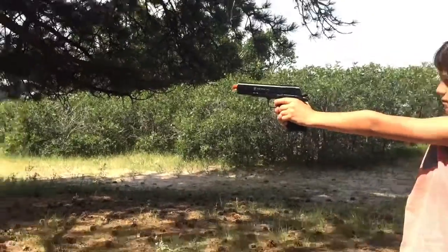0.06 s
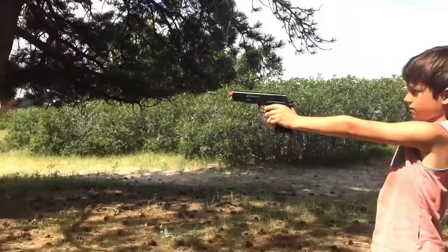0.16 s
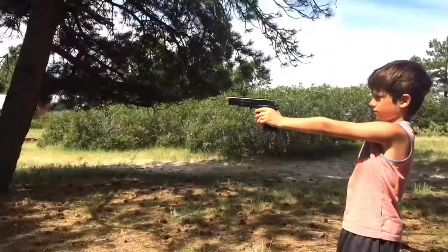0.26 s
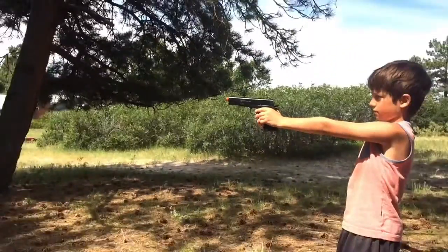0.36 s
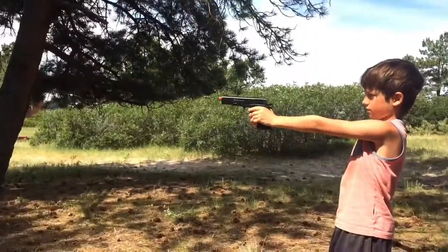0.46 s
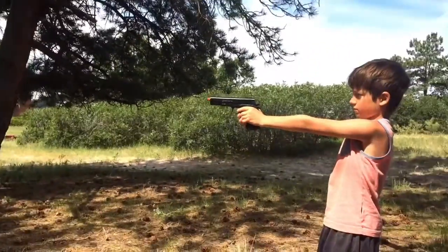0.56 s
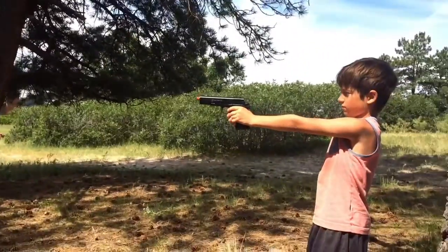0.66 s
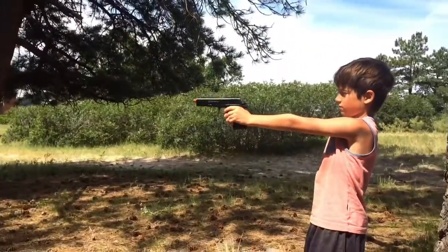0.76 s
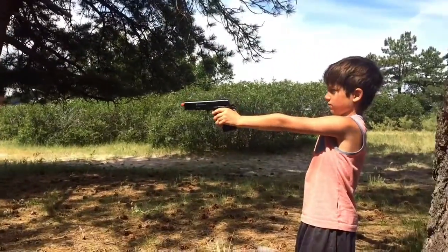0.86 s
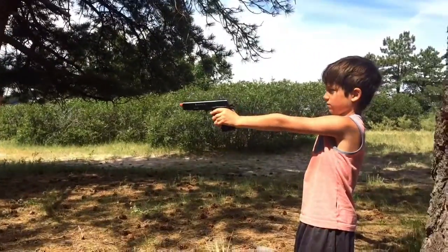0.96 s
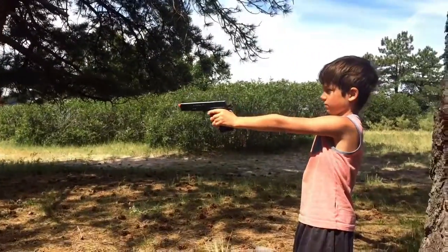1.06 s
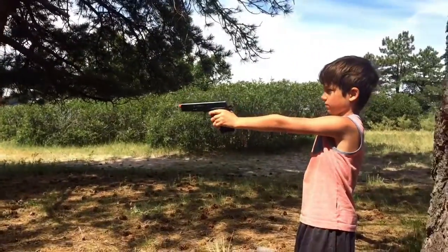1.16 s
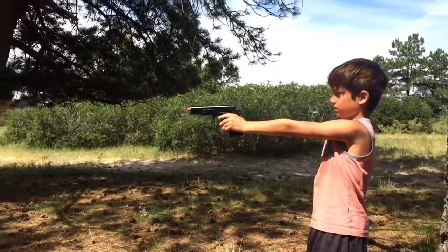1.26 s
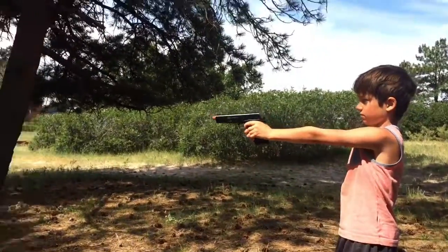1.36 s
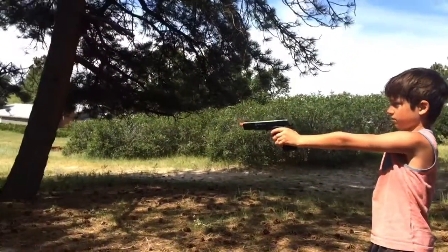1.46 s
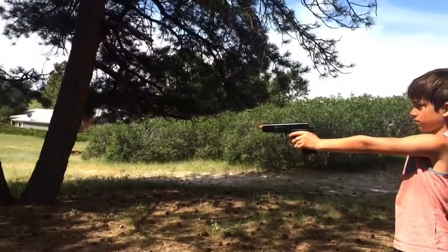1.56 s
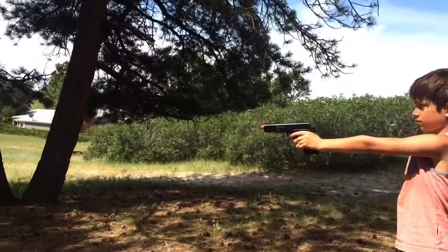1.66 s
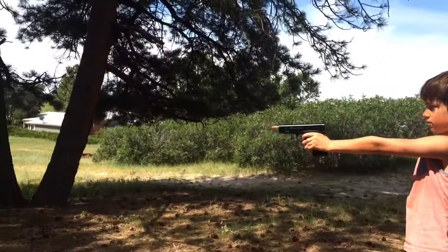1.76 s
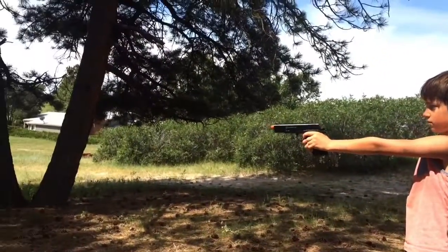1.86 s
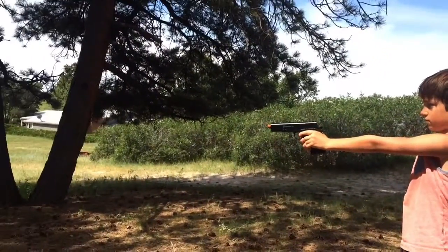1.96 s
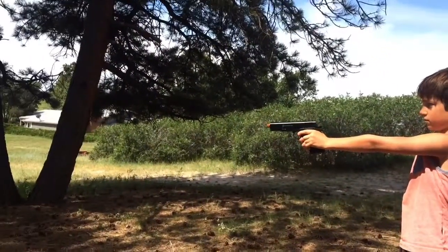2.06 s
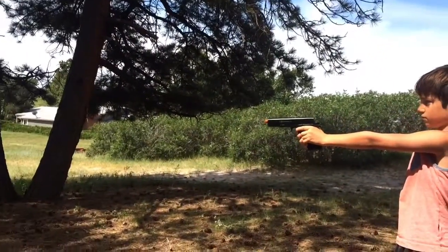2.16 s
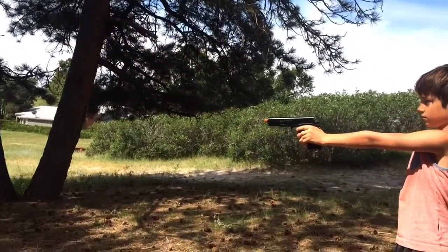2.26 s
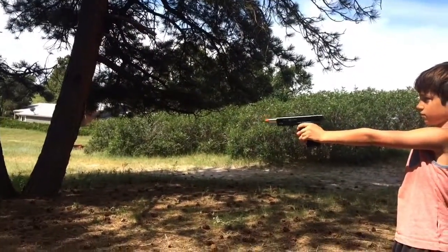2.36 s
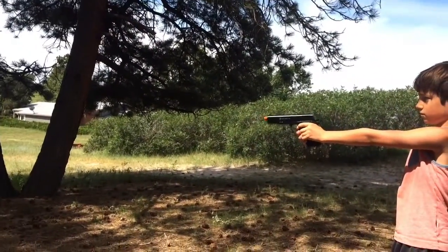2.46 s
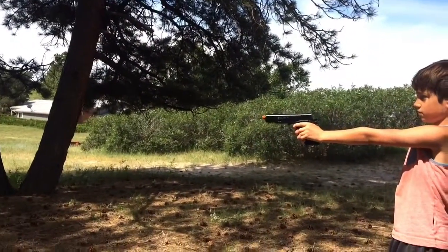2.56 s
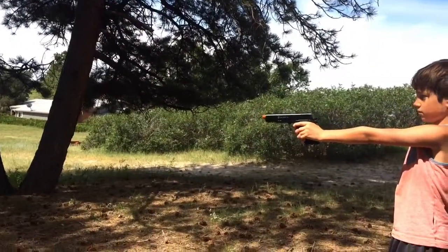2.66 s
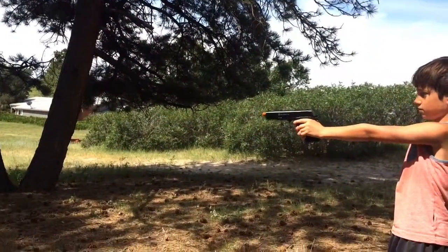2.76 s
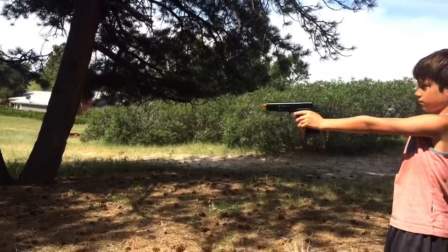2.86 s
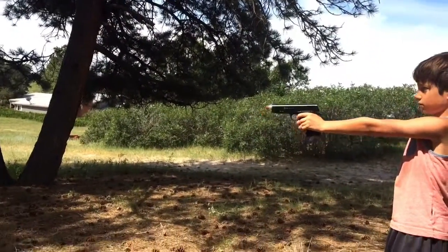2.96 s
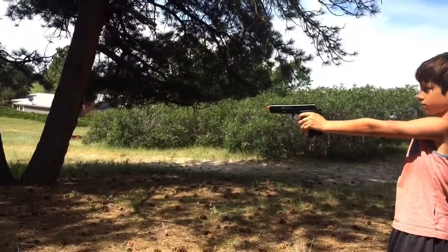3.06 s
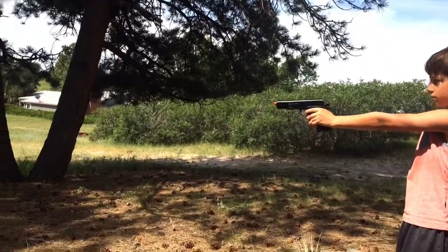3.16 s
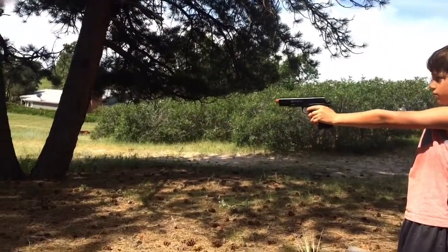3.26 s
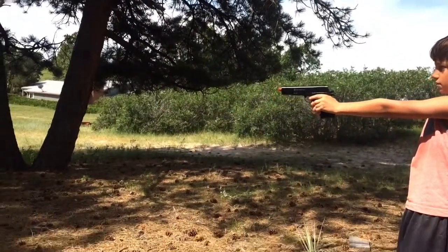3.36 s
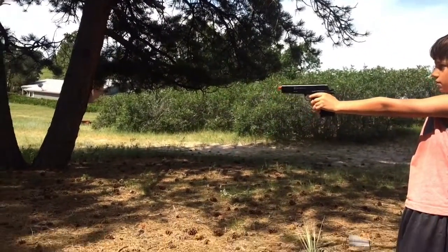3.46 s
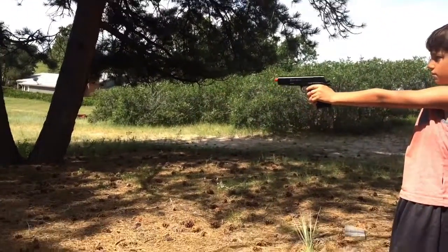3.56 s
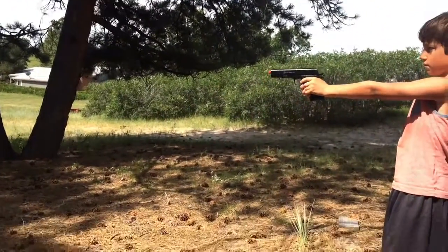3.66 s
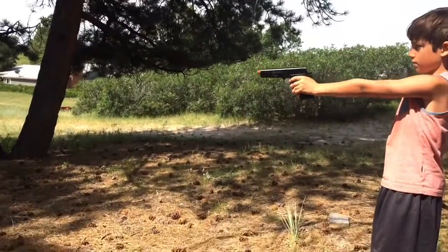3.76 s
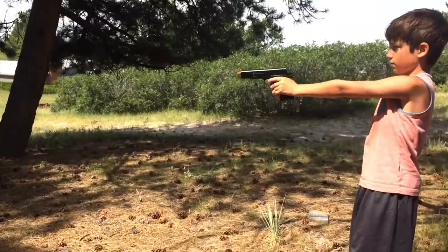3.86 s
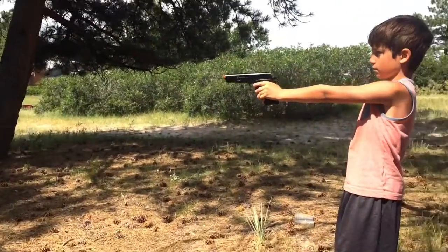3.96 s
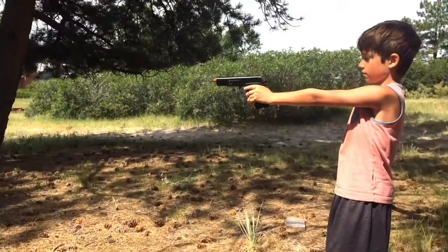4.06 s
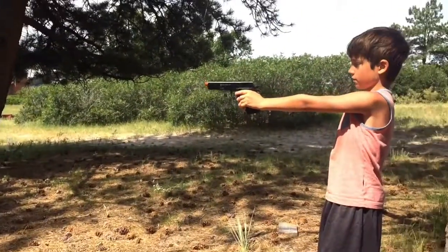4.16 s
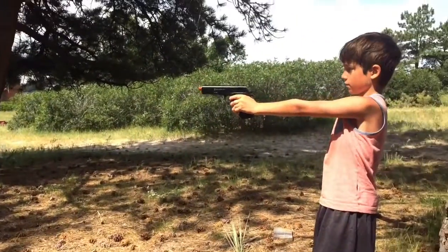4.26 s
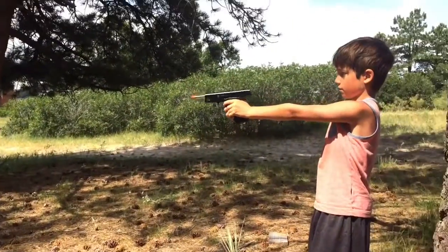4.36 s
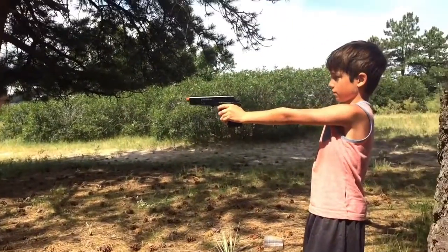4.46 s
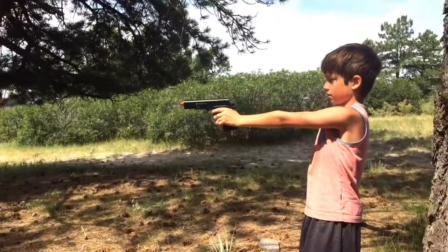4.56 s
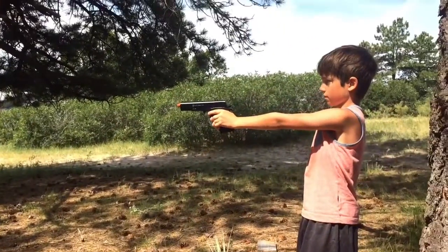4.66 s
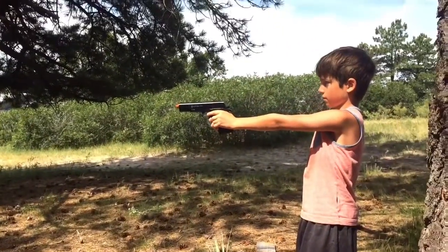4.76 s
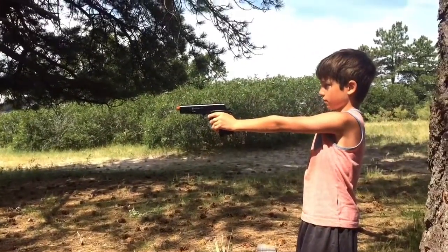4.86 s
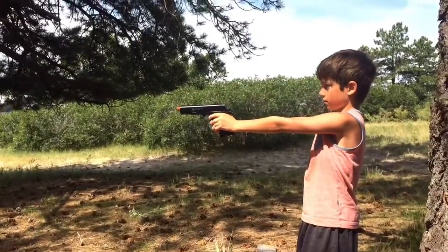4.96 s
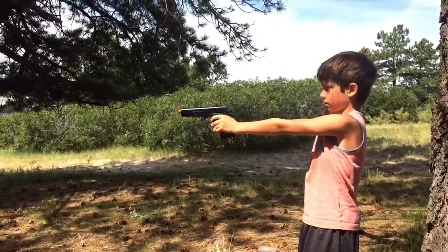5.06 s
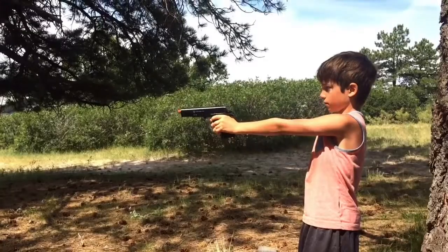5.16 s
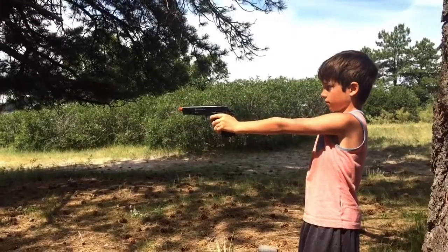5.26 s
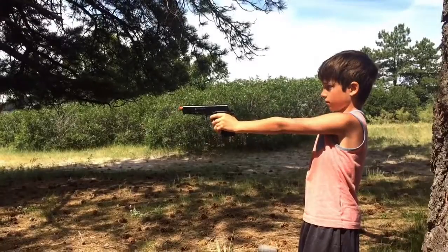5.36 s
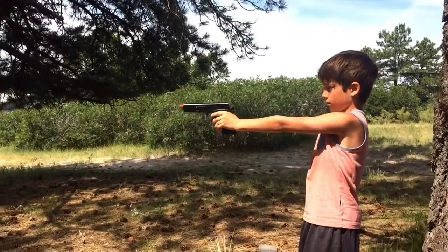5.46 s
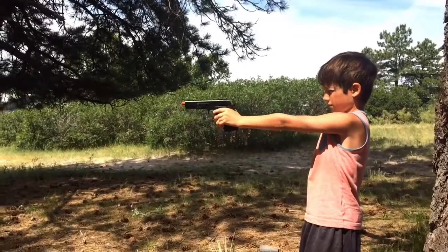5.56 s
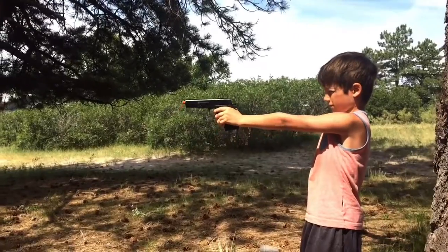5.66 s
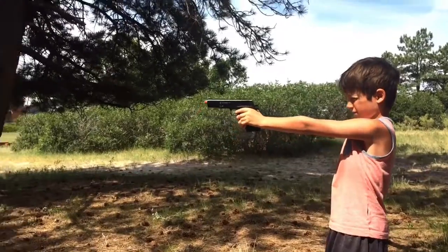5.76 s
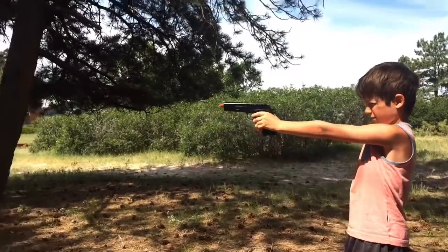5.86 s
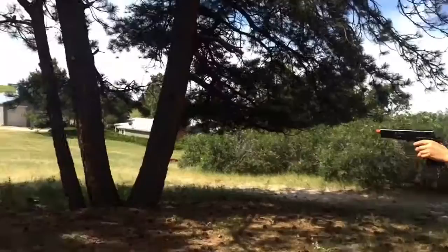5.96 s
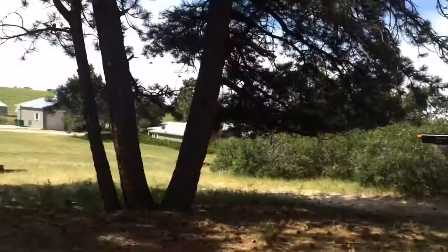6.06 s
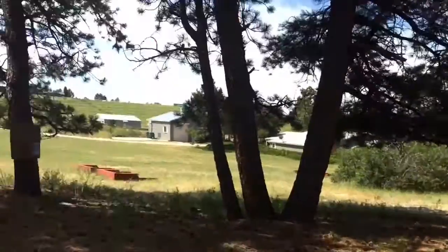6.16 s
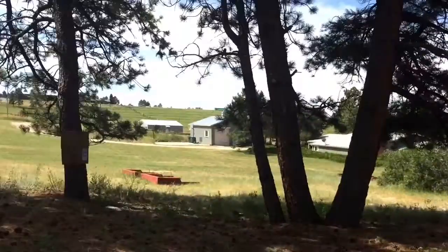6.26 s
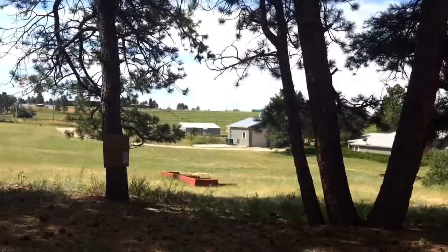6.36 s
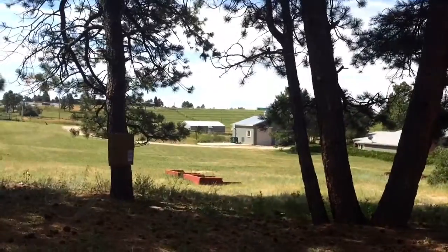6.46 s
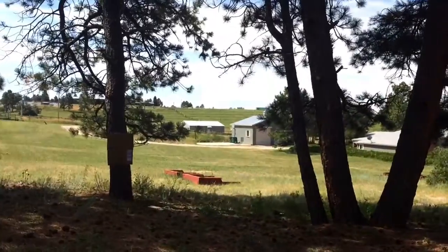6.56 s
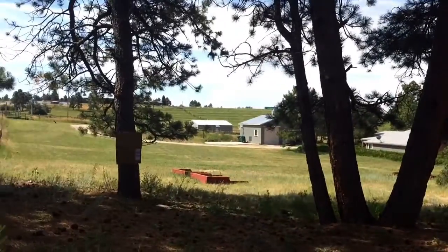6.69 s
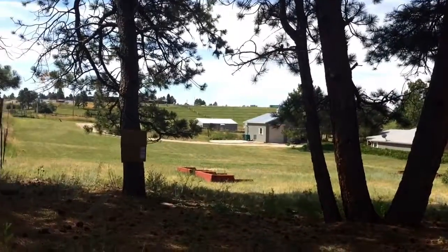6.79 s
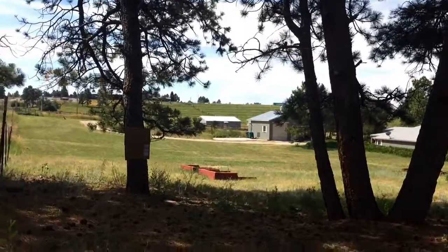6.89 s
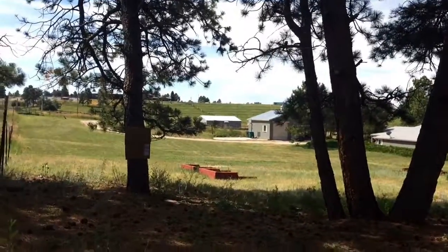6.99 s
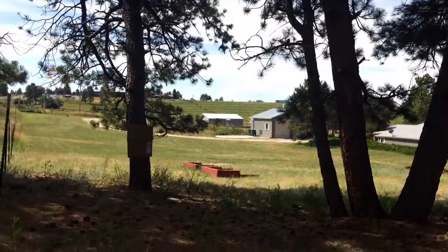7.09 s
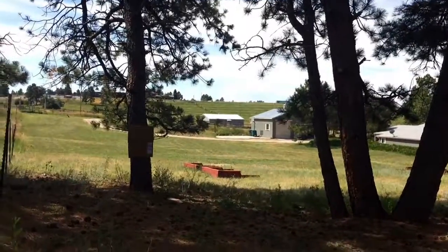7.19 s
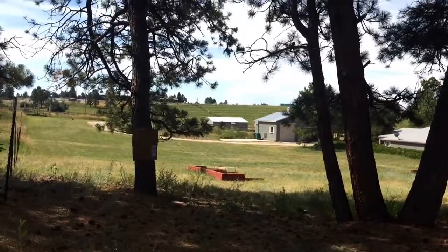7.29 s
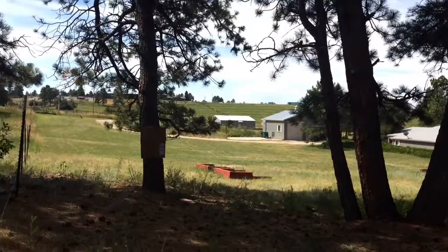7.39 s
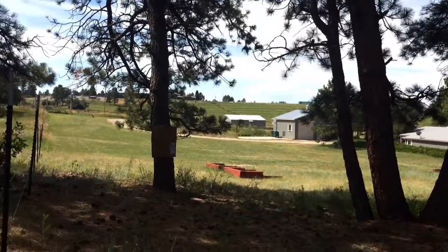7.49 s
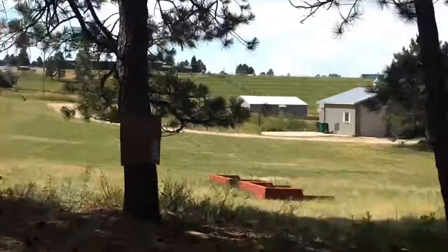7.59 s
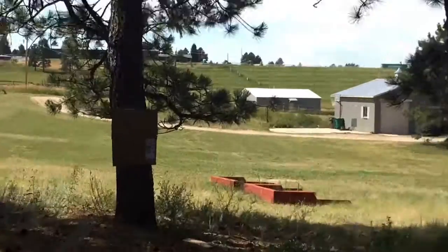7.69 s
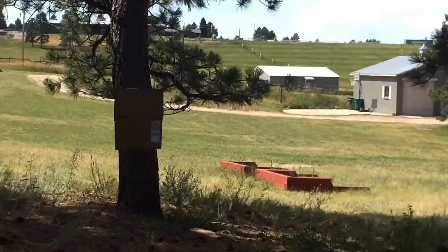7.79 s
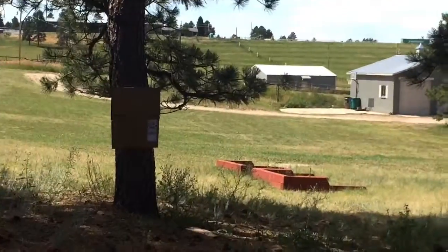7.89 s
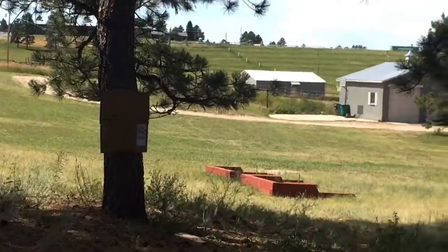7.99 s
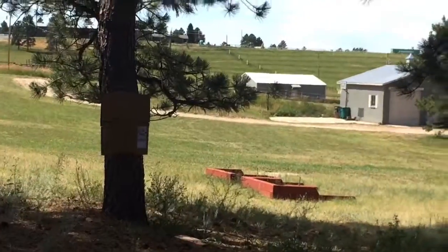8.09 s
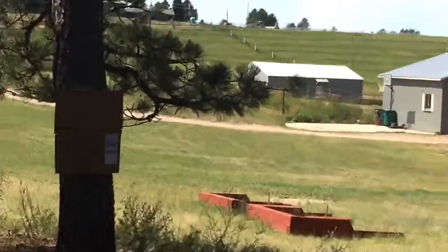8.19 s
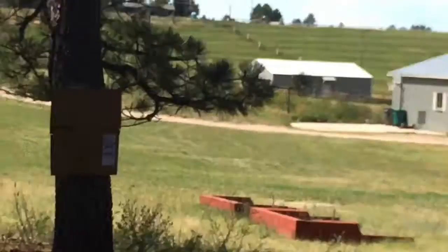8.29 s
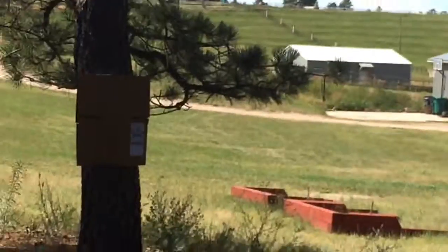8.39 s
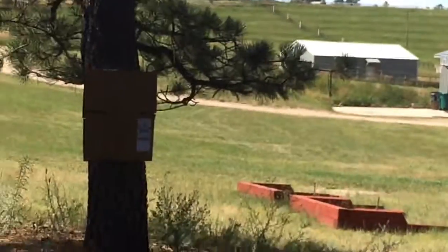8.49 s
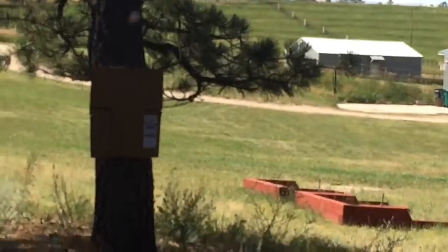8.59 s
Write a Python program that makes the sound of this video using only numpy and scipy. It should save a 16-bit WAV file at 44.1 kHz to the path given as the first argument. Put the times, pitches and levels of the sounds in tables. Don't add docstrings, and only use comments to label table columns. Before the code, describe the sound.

Snappy airsoft shots with clacking slide and cardboard hits echo through quiet pines; birds chirp in the pause before a softer final shot.

```python
import sys
import numpy as np
from scipy import signal
from scipy.fft import rfft, irfft, next_fast_len
from scipy.io import wavfile
from scipy.ndimage import uniform_filter1d

SR = 44100
rng = np.random.default_rng(int(sys.argv[2]) if len(sys.argv) > 2 else 0)


def generate_wav(sig):
    pcm = np.round(np.clip(np.atleast_2d(sig).T, -1, 1) * 32767).astype(np.int16)
    wavfile.write(sys.argv[1], SR, pcm)


def rack_gain(trim_db):
    fader = np.asarray(trim_db, float)
    return 10 ** (fader / 20)


N = 380583


def rms_one(x):
    return x / np.sqrt(np.mean(x ** 2) + 1e-20)


def noise():
    return rng.standard_normal(N)


def band(x, low_hz, high_hz):
    return signal.sosfilt(signal.butter(2, [low_hz, min(high_hz, .45 * SR)], "band", fs=SR, output="sos"), x)


def highpass(x, hz):
    return signal.sosfilt(signal.butter(4, hz, "high", fs=SR, output="sos"), x)


def ring(force, hz, t60):
    r = rack_gain(-60 / (t60 * SR))
    w = 2 * np.pi * hz / SR
    return signal.lfilter([0, np.sin(w)], [1, -2 * r * np.cos(w), r * r], force + 1e-18)


def fading(force, ms):
    return signal.lfilter([1], [1, -np.exp(-1000 / (ms * SR))], force + 1e-18)


def lobes(times, heights, rise_ms, fall_ms):
    peaks = clicks(times, heights)
    return fading(peaks[::-1], rise_ms)[::-1] + fading(peaks, fall_ms) - peaks


def clicks(times, heights):
    out = np.zeros(N)
    np.add.at(out, np.round(np.asarray(times) * SR).astype(int), heights)
    return out


def convolve(x, response):
    size = next_fast_len(N + len(response))
    return irfft(rfft(x, size) * rfft(response, size), size)[:N]


def struck(times, level_db, modes, t60, grit_ms, scrape=0):
    mode_hz, mode_db = np.transpose(modes)
    shares = rack_gain(mode_db + 2.5 * rng.standard_normal((len(times), len(modes))))
    shares = shares / np.sqrt(np.sum(shares ** 2, axis=1, keepdims=True))
    shares = shares * rack_gain(level_db)[:, None]
    out = 0
    for k, hz in enumerate(mode_hz):
        force = fading(clicks(times, shares[:, k]), grit_ms) + scrape * rack_gain(mode_db[k])
        out = out + ring(force * rng.choice([-1, 1], N), hz, t60)
    return out / np.sqrt(grit_ms * SR / 2000)


def scattered(table, onset_ms, clump_db):
    t = np.arange(SR) / SR
    clumps = [rms_one(band(rng.standard_normal(SR), 15, 200)) for _ in range(len(table) + 1)]
    shared = clumps[-1]
    tail = np.zeros(SR)
    for (hz, level_db, t60), own in zip(table, clumps):
        envelope = rack_gain(level_db - 60 * t / t60 + clump_db * (.6 * shared + .8 * own))
        tail += envelope * band(rng.standard_normal(SR), hz / 1.4, hz * 1.4)
    return tail * (1 - np.exp(-1000 * t / onset_ms))


# (frequency [Hz], density [dB per Hz])
AIR_SPECTRUM = [(15, -47), (25, -17), (45, 5), (82, 4), (270, -21.5), (394, -20.5), (962, -25),
                (1230, -28.5), (1890, -29.5), (4370, -31.5), (9070, -34), (14800, -38.5), (16000, -53.5)]
# (time [s], level [dB])
WIND = [
    (0, -63.5),
    (.7, -63.5),
    (2.299, -63),
    (4.5, -62),
    (5.8, -63.5),
    (6.5, -61),
    (7.4, -59.5),
    (8.3, -60.5),
    (8.63, -64),
]


def air():
    hiss_db, split_hz = -59, 220
    hz = np.arange(N // 2 + 1) * SR / N + 1
    points_hz, points_db = np.transpose(AIR_SPECTRUM)
    shape = rack_gain(np.interp(np.log(hz), np.log(points_hz), points_db))
    bed = rms_one(irfft(rfft(noise()) * shape, N))
    rumble = signal.sosfilt(signal.butter(4, split_hz, fs=SR, output="sos"), bed)
    hiss = highpass(bed, split_hz)
    lumps = rack_gain(1.5 * rms_one(band(noise(), 1.4, 4.6)))
    wind = rack_gain(np.interp(np.arange(N) / SR, *np.transpose(WIND)))
    return rack_gain(hiss_db) * hiss, wind * rms_one(rumble * lumps)


def ducking(depth_db, hold_s, back_s):
    t = np.arange(N) / SR
    drop = [np.interp(t - shot[0], [0, .01, hold_s, hold_s + back_s], [0, 1, 1, 0]) for shot in SHOTS]
    return rack_gain(-depth_db * np.max(drop, axis=0))


# (from [Hz], to [Hz])
LOW_HISS_HZ = (200, 470)


def ducked_air():
    hiss, rumble = air()
    drone = signal.sosfiltfilt(signal.butter(2, LOW_HISS_HZ, "band", fs=SR, output="sos"), hiss)
    bed = ducking(0.83, 0.17, 0.21) * (hiss - drone)
    return bed + ducking(13, 0.2, 0.15) * drone + ducking(17, 0.14, .4) * rumble


def insects():
    insects_hz, insects_db = 5300, -91
    throb = rack_gain(4 * rms_one(band(noise(), 3, 30)))
    swell = np.interp(np.arange(N) / SR, [5.6, 6.2], [.3, 1])
    song = rms_one(band(noise(), insects_hz - 200, insects_hz + 200))
    return rack_gain(insects_db) * swell * throb * song


# (band centre [Hz], returned level [dB], t60 [s])
BARN = [(704, -68.5, 0.7), (1360, -51, 1), (2605, -51, .8), (5000, -60.5, 0.34), (8030, -71.5, 0.36),
        (13000, -85, 0.15)]


def far_barn():
    delay_s, slap_db, slap_ms = .349, -34.5, 1.2
    response = scattered(BARN, onset_ms=6.9, clump_db=4)
    n = SR // 10
    slap = np.exp(-np.arange(n) / (slap_ms / 1000 * SR)) * rng.standard_normal(n)
    response[:n] += rack_gain(slap_db) * band(slap, 2370, 3950)
    return np.concatenate([np.zeros(int(delay_s * SR)), response])


def earlier_shot(barn):
    returned = signal.fftconvolve(barn, rng.standard_normal(SR // 20))
    return rack_gain(-32.5) * np.pad(returned[int(.45 * SR):], (0, N))[:N]


# (time [s], length [s], from [Hz], to [Hz], level [dB])
WHISTLES = [
    (0.1, 0.039, 3280, 4100, -68),
    (.135, 0.039, 4000, 3440, -80),
    (0.246, 0.15, 7400, 3410, -65.5),
    (0.474, .145, 7500, 3460, -64.5),
    (0.71, 0.15, 7400, 3450, -65.5),
    (6.505, 0.036, 4400, 3300, -82.5),
    (6.837, .045, 4000, 2660, -79),
    (7.268, 0.12, 3500, 2900, -83),
]
# (time [s], frequency [Hz], level [dB])
LISP = [
    (.552, 8800, -88),
    (0.565, 7900, -68),
    (0.601, 9300, -86),
    (0.625, 7600, -75),
    (0.668, 7700, -74),
    (0.692, 8800, -84),
    (.712, 7740, -72.5),
    (.74, 8200, -77.5),
    (0.831, 8450, -88.5),
]
# (time [s], length [s], level [dB])
CHURRS = [
    (7.085, 0.059, -65),
    (7.212, 0.058, -65),
    (7.349, 0.047, -64),
    (7.474, 0.081, -65.5),
]


def birds():
    out, t = np.zeros(N), np.arange(N) / SR
    for s, length, from_hz, to_hz, level_db in WHISTLES:
        u = np.arange(int(length * SR)) / (length * SR)
        hz = from_hz + (to_hz - from_hz) * u ** .8
        swell = rack_gain(level_db + 9.2 * u) * np.sin(np.pi * u) ** 0.27
        out[int(s * SR):][:len(u)] += swell * np.sin(2 * np.pi * np.cumsum(hz) / SR)
    s, hz, level_db = np.transpose(LISP)
    loudness = rack_gain(np.interp(t, s, level_db, left=-200, right=-200))
    out += loudness * np.sin(2 * np.pi * np.cumsum(np.interp(t, s, hz)) / SR)
    for s, length, level_db in CHURRS:
        u = np.arange(int(length * SR)) / SR
        sweep = (u * 62 % 1) ** 2.1 * np.minimum(u / .03, 1)
        swell = rack_gain(level_db) * np.sin(np.pi * u / length) ** 0.39
        out[int(s * SR):][:len(u)] += swell * np.sin(2 * np.pi * np.cumsum(4450 - 1400 * sweep) / SR)
    u = np.arange(SR // 2) / SR
    smear = rack_gain(-33.0 - 60 * np.maximum(u - .04, 0) / 0.21) * rng.standard_normal(len(u))
    return out + convolve(out, smear)


def after_each(times, rows):
    uneven_db, uneven_ms = 2.0, .4
    ms, *levels_db = np.transpose(rows)
    chance = rng.standard_normal((len(times), len(rows), 4))
    late_ms = uneven_ms * chance[..., 0] * (ms != 0)
    s = np.asarray(times)[:, None] + (ms + late_ms) / 1000
    return [s] + [db + uneven_db * chance[..., k + 1] for k, db in enumerate(levels_db)]


# (time [s], grip [dB], frame ring [dB], slide ring [dB])
TICKS = [(0.6078, -49, -71, -65), (0.7776, -54, -63, -56), (7.7814, -76, -70, -43),
         (1.167, -73, -70, -56.5), (1.5546, -59, -40, -35.5), (1.5603, -61, -61, -41),
         (5.207, -64, -57, -60), (6.3378, -70.5, -79, -62), (6.3505, -78, -79, -58), (6.36, -71, -80, -48),
         (6.373, -74, -76, -56), (6.3931, -58, -61, -69), (6.5527, -68, -71, -57.5),
         (6.6185, -66, -70, -72), (6.8979, -78, -76, -59), (6.6879, -65.5, -73, -62),
         (6.8328, -66, -64, -54), (8.17, -47, -44.5, -52.5), (8.3562, -51.5, -62, -54.5)]
# (time after the valve [ms], grip [dB], frame ring [dB], slide ring [dB])
SEAR = [
    (-24.5, -43, -55, -47),
    (-17, -34.5, -51.5, -49.5),
]
# (time [s], push height, blow-back height, grip ring [dB], frame ring above usual [dB])
SHOTS = [
    (0.9573, 0.68, -.45, 1.5, 3),
    (1.598, 0.13, -0.57, 0, 4),
    (2.0901, .36, -0.65, -5.5, -4.5),
    (2.6658, 0.85, -0.3, 0, -2.5),
    (3.2844, 1.0, -0.8, 3, -2.5),
    (3.9258, 0.64, -0.38, 5, -6.5),
    (4.671, 0.28, -0.3, 7.5, 6),
    (5.3183, 0.23, -0.36, 5, 4.5),
    (7.594, 0.084, -0.132, 3, -9),
]
# (time after the valve [ms], grip [dB], frame ring [dB], slide ring [dB])
OPENING = [
    (0, -18, -20.5, -9.5),
    (5.7, -10, -19.5, -17),
    (10, -13, -17, -14),
    (16, -21.5, -22, -20),
]
# (time [s], strength [dB], frame ring above usual [dB])
SLAMS = [
    (0.9969, -1, 3.5),
    (1.6418, 1, 2),
    (2.1301, -0.5, -2.5),
    (2.7089, -0.5, 0),
    (3.3254, 2.5, 1.5),
    (3.9662, 0.5, -2.5),
    (4.713, 1, -1.5),
    (5.362, -0.5, 1.5),
    (7.638, 1.5, -14.5),
]
# (time after the slam [ms], grip [dB], frame ring [dB], slide ring [dB])
CLOSING = [
    (-16.5, -26, -26, -20),
    (-9.5, -25.5, -26, -19.5),
    (0, -18.5, -7, -5.5),
    (7, -22, -11, -11.5),
    (23, -38, -31.5, -37.5),
]
# (time [s], level [dB])
RESETS = [
    (1.1979, -33.5),
    (1.7779, -29.5),
    (2.2685, -31),
    (2.8323, -32.5),
    (3.4628, -33),
    (4.139, -32),
    (4.8465, -29),
    (5.5182, -32.5),
    (7.7957, -37.5),
]


def contacts():
    valve, _, _, grip_db, frame_db = np.transpose(SHOTS)[..., None]
    slam, slam_db, slam_frame_db = np.transpose(SLAMS)[..., None]
    s, grip, frame, slide = after_each(valve[:, 0], OPENING)
    opening = np.reshape([s, grip + grip_db, frame + frame_db, slide], (4, -1))
    s, grip, frame, slide = after_each(slam[:, 0], CLOSING)
    closing = np.reshape([s, grip + slam_db, frame + slam_db + slam_frame_db, slide + slam_db], (4, -1))
    s, reset_db = np.transpose(RESETS)
    resets = [s, reset_db - 21, reset_db + 0.5, reset_db]
    sear = np.reshape(after_each(valve[:, 0], SEAR), (4, -1))
    return np.hstack([opening, closing]), np.hstack([sear, resets, np.transpose(TICKS)])


# (time after the valve [s], scraping level [dB])
STROKE = [
    (-.022, -58.5),
    (-.007, -41),
    (-.002, -31.5),
    (0.002, -19),
    (0.022, -30.5),
    (0.032, -24),
    (.039, -29),
    (.050, -27.5),
    (0.061, -62.5),
]


def scraping():
    hush_ms, hush_db, burr_db = 4.0, -9.5, 4
    after, scrape_db = np.transpose(STROKE)
    t = np.arange(N) / SR
    stroke = sum(rack_gain(np.interp(t - shot[0], after, scrape_db, left=-200, right=-200)) for shot in SHOTS)
    hush = sum(hush_db * ((t > s - hush_ms / 1000) & (t < s)) for s, *_ in SLAMS)
    return stroke * rack_gain(hush) * rack_gain(burr_db * rms_one(band(noise(), 100, 1200)))


# (frequency [Hz], level [dB])
GRIP = [(480, -3.5), (760, -10), (1120, -8.5), (1500, -12), (1850, -2), (2080, -1), (2420, -0.5)]
# (frequency [Hz], level [dB])
FRAME = [(2780, -11), (2990, 0), (3130, -1), (3560, -9), (4300, -14)]
# (frequency [Hz], level [dB])
SLIDE = [(4950, -14), (5600, -16.5), (6550, -6.5), (6950, -3), (7300, -6), (7700, -1.5), (8200, -3),
         (8650, -1.5), (9100, -2.5), (9600, -6), (10200, -7), (11000, -8), (11700, -11.5), (12600, -8),
         (13400, -6), (14100, -6), (14900, -11)]


def pistol(blows, ticks):
    grip_t60_s, frame_t60_s, slide_t60_s = 0.013, 0.02, 0.017
    burrs = scraping()
    s, grip_db, frame_db, slide_db = np.hstack([blows, ticks])
    grip = struck(s, grip_db - 3.0, GRIP, grip_t60_s, grit_ms=0.067, scrape=rack_gain(-24.0) * burrs)
    frame = struck(s, frame_db + 0.1, FRAME, frame_t60_s, grit_ms=0.095, scrape=rack_gain(-27) * burrs)
    slide = struck(s, slide_db + 1.0, SLIDE, slide_t60_s, grit_ms=.5, scrape=rack_gain(-17.0) * burrs)
    snap = fading(clicks(s, rack_gain(slide_db - 7.5)), 1.0) + rack_gain(-2.0) * burrs
    snap += fading(clicks(ticks[0], rack_gain(ticks[3] - 4)), 2.5)
    snap = band(snap * noise(), 1200, 13000)
    return grip + band(frame, 1700, 4800) + band(slide, 2500, 14000) + snap


# (time [s], peak [dB], frequency [Hz])
SKIPS = [(0.623, -46, 829), (2.286, -39, 1120), (2.342, -49, 1150), (2.386, -45, 996), (2.409, -43, 1150),
         (2.444, -46, 1160), (2.888, -48, 915), (5.082, -46, 1030), (5.134, -34, 977), (5.181, -39, 980),
         (5.219, -60, 1230), (5.269, -40, 1000), (8.304, -46, 864)]


def skips(t60_s=.021):
    out = np.zeros(N)
    for s, knock_db, hz in SKIPS:
        soft = fading(clicks([s], .1), .25)
        out += rack_gain(knock_db + 3) * (ring(soft, hz, t60_s) + .5 * ring(soft, 1.45 * hz, t60_s))
    s, knock_db, _ = np.transpose(SKIPS)
    grit = fading(clicks(s, rack_gain(knock_db - 6)), 1.2)
    return out + band(grit * noise(), 540, 3780)


# (time [s], panel [Hz], panel level [dB], flap [Hz], flap level [dB])
BOX_HITS = [
    (1.6953, 1360, -11, 1390, -13),
    (2.1842, 943, -7.5, 1460, -14.5),
    (2.7618, 950, -10.5, 2810, -12.5),
    (3.3808, 990, -35, 2090, -18.5),
    (4.7699, 1208, -12.5, 1990, -12),
    (5.4173, 1150, -9.5, 2170, -12),
    (7.6956, 1294, -16.5, 1840, -11.5),
]
# (frequency [Hz], level [dB])
CARDBOARD = [(560, -18), (810, 1), (1050, -0.5), (1190, -10), (1420, -4.5), (1690, -4.5), (2100, 1),
             (2400, -5.5), (2750, -1.5), (3450, -2.5), (4300, -12.5)]
# (band centre [Hz], level [dB], t60 [s])
THICKET = [(900, -12.5, 0.28), (1400, -17.5, 0.4), (2392, -16.5, 0.39), (4445, -23.5, 0.27),
           (7900, -19, .2), (13000, -31.5, .16)]


def box():
    t60_s, crack_db, crack_ms = .016, -9, .5
    miss_s, miss_db = 1.048, -19
    out = skips()
    for s, panel_hz, panel_db, flap_hz, flap_db in BOX_HITS:
        hit = clicks([s], 1)
        out += rack_gain(panel_db - 1.5) * ring(hit, panel_hz, 2.1 * t60_s)
        out -= rack_gain(flap_db - 1.5) * ring(hit, flap_hz, t60_s)
    s, _, _, _, flap_db = np.transpose(BOX_HITS)
    crack = fading(clicks(s, rack_gain(crack_db)) + clicks([miss_s], rack_gain(miss_db)), crack_ms)
    out += band(crack * rng.choice([-1, 1], N), 2200, 15500)
    out += struck(s, flap_db + 6.5, CARDBOARD, t60_s, grit_ms=0.97)
    woods = convolve(clicks(s, rack_gain(flap_db)), scattered(THICKET, onset_ms=1.5, clump_db=2.5))
    return highpass(out, 480) + woods


# (band centre [Hz], scattered level [dB], t60 [s])
GROVE = [(700, -52, .3), (1430, -42.5, 0.36), (2800, -36.5, 0.4), (5000, -38.5, .33), (8000, -37, 0.24),
         (13000, -42, 0.26)]


def grove(blows):
    s, grip_db, _, slide_db = blows
    reports = clicks(s, rack_gain((grip_db + slide_db) / 2 + 12) * rng.choice([-1, 1], len(s)))
    return convolve(reports, scattered(GROVE, onset_ms=2.0, clump_db=2.0))


BLOW_BACK_LAG_S = .0058


def gas():
    push_lag_s, suction_lead_s, suction_share = .00055, .0072, 0.46
    valve, push, blow_back = np.transpose(SHOTS)[:3]
    s = valve + push_lag_s
    drawn = lobes(s - suction_lead_s, -1.15 * suction_share * push, rise_ms=4.0, fall_ms=1.0)
    pushed = lobes(s - .0002, 1.3 * push, rise_ms=.45, fall_ms=1.15)
    snapped = lobes(valve + BLOW_BACK_LAG_S, 1.3 * blow_back, rise_ms=.4, fall_ms=1.2)
    return uniform_filter1d(uniform_filter1d(drawn, size=40) + pushed + snapped, size=20)


def muzzle():
    s = np.transpose(SHOTS)[0]
    gun = clicks(s, .8) + clicks(s + BLOW_BACK_LAG_S, .9) + clicks(s + .012, .6) + clicks(s + .043, .5)
    hit, hit_db = np.transpose(BOX_HITS)[[0, 4]]
    carton = band(fading(clicks(hit, rack_gain(hit_db + 9)), 0.27) * noise(), 800, 2600)
    return rack_gain(-4.5) * (fading(gun, 0.095) * rng.choice([-1, 1], N) + carton)


def scene():
    blows, ticks = contacts()
    barn = far_barn()
    background = ducked_air() + insects() + earlier_shot(barn) + birds()
    direct = pistol(blows, ticks) + box() + gas()
    answers = grove(blows) + convolve(muzzle(), barn)
    return (background + direct + answers)[None]


def top_cut(x):
    return signal.sosfilt(signal.butter(12, 16460, fs=SR, output="sos"), x)


def record(dry):
    x = signal.sosfiltfilt(signal.butter(2, 40, "high", fs=SR, output="sos"), dry)
    x = x / (1 + np.abs(x / .92) ** 6) ** (1 / 6)
    x = signal.sosfiltfilt(signal.cheby2(6, 20, 15900, fs=SR, output="sos"), x)
    return top_cut(x)


dry = scene()
out = record(dry)
generate_wav(out)
```